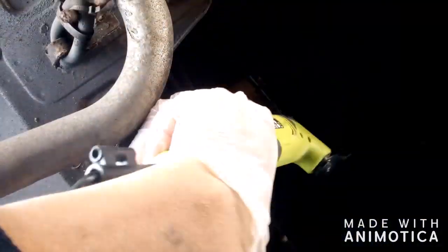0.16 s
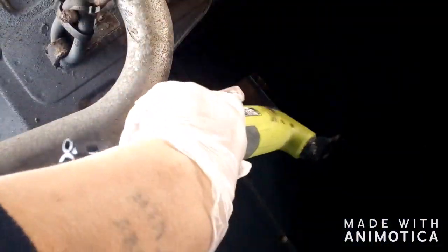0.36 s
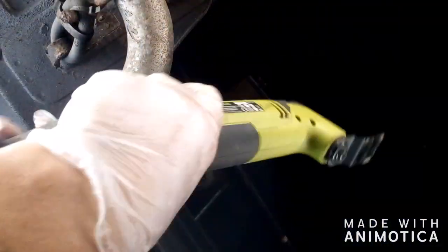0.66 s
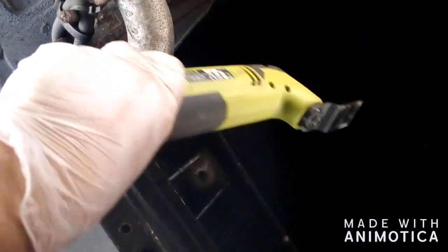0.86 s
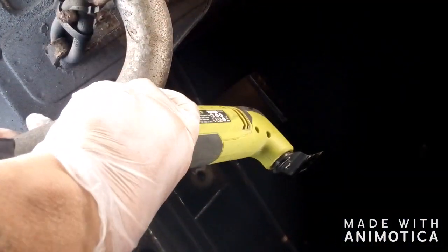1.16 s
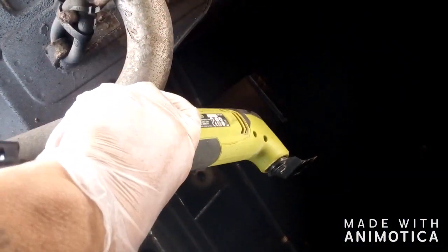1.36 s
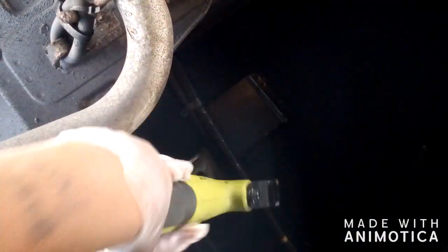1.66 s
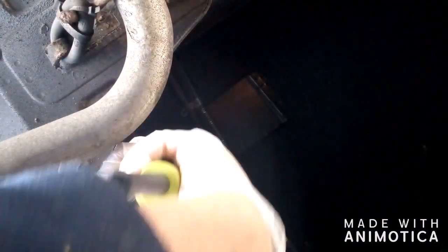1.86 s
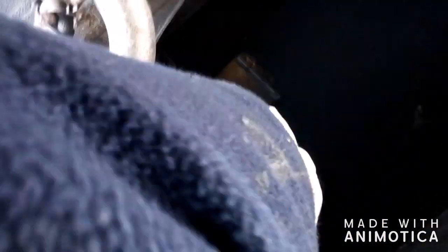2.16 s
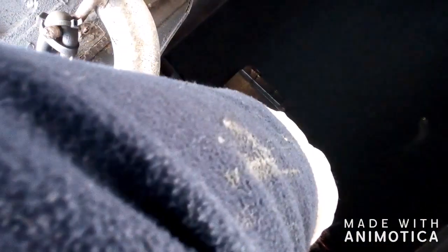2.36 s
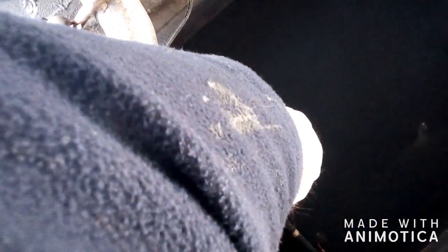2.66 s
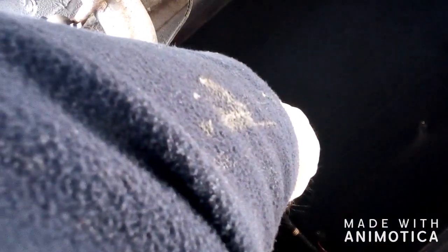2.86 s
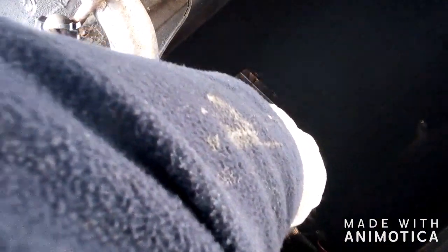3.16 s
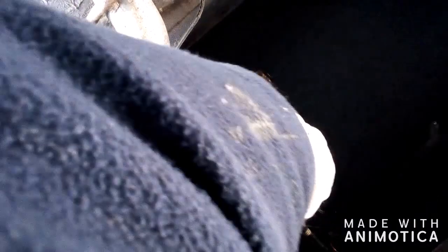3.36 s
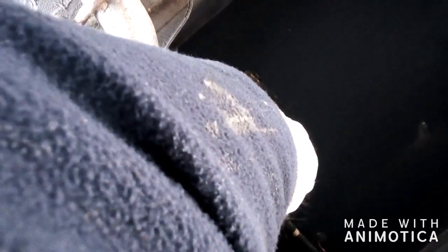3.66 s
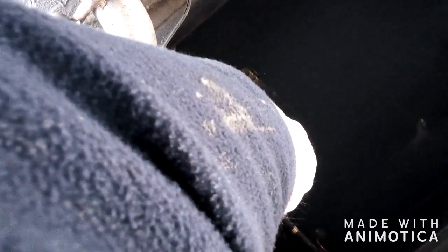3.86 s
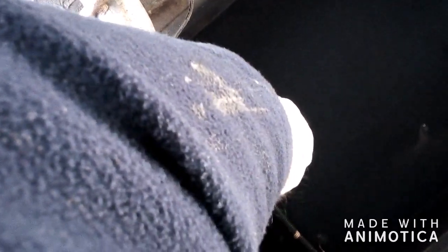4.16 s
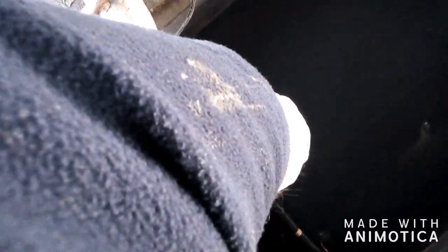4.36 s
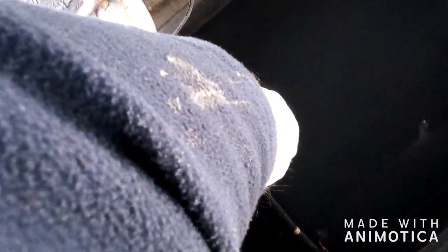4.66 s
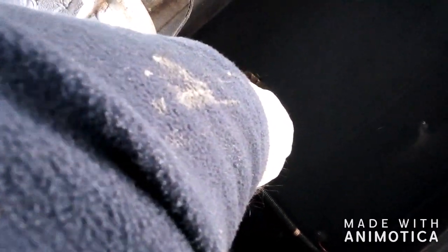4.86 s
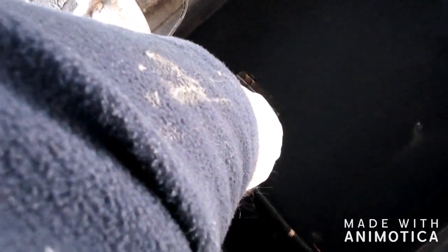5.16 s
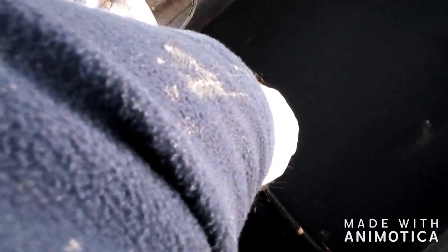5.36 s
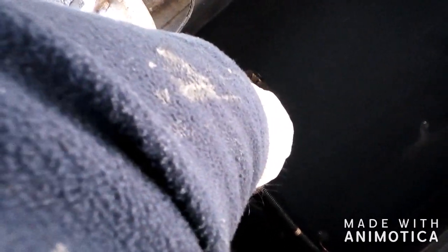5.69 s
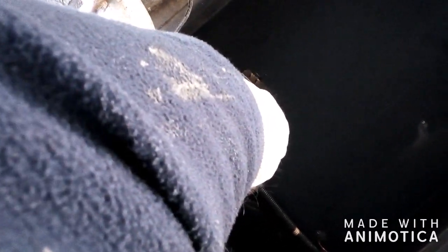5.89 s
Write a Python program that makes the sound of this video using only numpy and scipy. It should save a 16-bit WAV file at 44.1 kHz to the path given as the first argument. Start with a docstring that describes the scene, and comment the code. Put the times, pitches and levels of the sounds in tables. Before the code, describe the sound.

Close, high whine and hiss of an electric tool that stops briefly, starts again and works on steel in gusty wind.

```python
"""Geared power tool on steel, outdoors

Held close to a pair of microphones, a small tool runs free, is switched off, starts again and is pressed
on steel, which pulls its speed down. The gear mesh whines in overtones over brush and fan hiss. The
tool's air and grit puff at the left microphone, wind buffets the right, and faint noise lies far behind."""
import sys
import numpy as np
from scipy import signal
from scipy.fft import rfft, irfft
from scipy.io import wavfile
from scipy.ndimage import map_coordinates

SR = 44100
rng = np.random.default_rng(int(sys.argv[2]) if len(sys.argv) > 2 else 0)


def put_to_file(sound):
    """Save the sound as 16-bit audio at rate SR, in the file named by the first command-line argument."""
    columns = np.atleast_2d(sound).T  # one column per channel
    safe = np.clip(columns, -1, 1)
    whole_steps = np.round(safe * 32767)
    wavfile.write(sys.argv[1], SR, whole_steps.astype(np.int16))


N = 265915
TIME = np.arange(N) / SR
OFF_S, ON_S = .431, 1.521   # the switch
CUTOFF_HZ, SING_FADE_DB_PER_S = 15720, 296
# start and end of the change of grip, then of the reach out to the work: (time [s])
MOVES_S = (1.2, 1.9, 2.9, 3.099)


def mesh_rate():
    """Tooth contacts per second: running free, coasting against drag and friction, restarting, cutting."""
    # what the motor holds after the restart, sagging under the cut: (time [s], mesh rate [Hz])
    working = [(2.0, 1208), (2.34, 1199), (3.04, 1161), (3.2, 1141), (3.32, 1166), (3.42, 1160),
               (3.58, 1129), (3.92, 1130), (4.2, 1164), (4.33, 1129), (4.74, 1156), (5.13, 1141),
               (5.33, 1110), (5.59, 1106), (5.73, 1122), (6.03, 1105)]
    free_hz, friction_hz, coast_s, spin_up_s = 1224, 1410, .703, .087
    coasting = (free_hz + friction_hz) * np.exp(-np.maximum(TIME - OFF_S, 0) / coast_s) - friction_hz
    restarted = in_time(working)[0] * (1 - np.exp(-np.maximum(TIME - ON_S, 0) / spin_up_s))
    return np.maximum(1, np.maximum(coasting, restarted))


def whine_levels(mesh_hz):
    """Left and right dB of each line as the hand moves, keyed by rotor order (three to a mesh overtone)."""
    # mesh overtones 1 to 11 without the 7th, a row each:
    # (left [dB], right [dB]) in the first grip, again in the second grip, again at the work
    overtones = [(-54, -56, -51.5, -47, -53.5, -47.5), (-27, -24, -44, -43.5, -47.5, -44.5),
                 (-39.5, -36, -39, -35, -51, -42.5), (-32.5, -31.5, -31, -38, -36, -35.5),
                 (-36, -50, -46, -62, -66, -32.5), (-31.5, -29, -55, -33.5, -70, -31.5),
                 (-39, -34.5, -61, -28.5, -62, -30.5), (-50, -33.5, -34, -53, -36, -42.5),
                 (-53, -53, -60, -49, -51, -31.5), (-38, -58, -39, -59, -36, -69)]
    # the 7th, the loudest whistle, as the hand turns the tool: (time [s], left [dB], right [dB])
    seventh = [(0.2, -25, -28), (0.42, -45, -20.5), (1.85, -23.5, -41), (2.1, -35, -13), (2.44, -32, -10),
               (2.7, -32.5, -24), (3.1, -14.5, -18), (3.3, -30.5, -28.5), (3.5, -19, -13.5),
               (3.94, -28, -23), (4.12, -27, -33), (4.4, -29, -26), (5.03, -19, -33), (5.14, -29, -25.5),
               (5.46, -10.5, -13), (5.64, -20.5, -22), (6.02, -17, -24)]
    # the line nearest a pitch sings out: (start [s], length [s], pitch [Hz], left [dB], right [dB])
    singing = [(0.05, 0.31, 6100, -24.5, -28), (0.1, 0.2, 8150, -42, -38), (1.794, 0.19, 3550, -29, -21.5),
               (1.74, 1.06, 15500, -31, -42), (1.744, 0.34, 13100, -35, -28),
               (2.347, 0.28, 3180, -39, -31.5), (2.617, 0.28, 2370, -34.5, -27),
               (2.725, 0.23, 12950, -31, -24), (2.826, 0.37, 5850, -35.5, -31),
               (2.83, 0.33, 6950, -41, -21.5), (3.106, 0.45, 10350, -46, -29),
               (3.215, 0.18, 3470, -33, -23), (3.295, 0.18, 4630, -26.5, -40),
               (3.413, 0.53, 6800, -37, -24.5), (3.555, 0.37, 1130, -48, -41),
               (3.997, 0.36, 3450, -47, -23), (4.009, 1.3, 10350, -47, -27), (4.184, 0.5, 5750, -50, -29),
               (4.21, 0.92, 6900, -35, -23), (4.505, 0.45, 2300, -57, -30.5), (4.615, 0.11, 5020, -32, -36),
               (4.415, 0.66, 3450, -40, -31), (2.158, 0.43, 4780, -26, -30),
               (5.277, 0.37, 5540, -58, -23.5), (5.29, 0.4, 4430, -48, -30),
               (5.347, 0.209, 1107, -38.5, -36), (4.192, 0.096, 2300, -45.5, -31.5),
               (4.116, 0.2, 14470, -25, -35)]
    pose = np.interp(TIME, MOVES_S, (0, 1, 1, 2))   # first grip, second grip, at the work
    steady = [[np.interp(pose, range(3), db[side::2]) for side in (0, 1)] for db in overtones]
    steady.insert(6, list(in_time(seventh)))
    lines = {3 * (i + 1): db for i, db in enumerate(steady)}
    rotor_db = np.interp(pose, range(3), (-53, -50, -51.5))   # faint lines between and above those
    for order in [*range(7, 33), 36, 37.5, 39]:
        lines.setdefault(order, [rotor_db, rotor_db])
    for start, length, hz, *db in singing:
        sung_order = 3 * hz / mesh_hz[round((start + length / 2) * SR)]
        line = lines[min(lines, key=lambda order: abs(order - sung_order))]
        for side in (0, 1):
            line[side] = np.maximum(line[side], held([(start, length, db[side])], SING_FADE_DB_PER_S))
    return lines


def housing_db(pitch_hz):
    """Gain that the resonances of the housing give a line at this pitch."""
    # resonances of the housing: (frequency [Hz])
    resonances = [2850, 4100, 5070, 6700, 7900, 10130]
    grid_hz = np.arange(1, 40000, 50)
    power = sum(1 / (1 + ((grid_hz - hz) / (0.045 * hz)) ** 2) for hz in resonances)
    return np.interp(pitch_hz, grid_hz, 10 * np.log10(power))


def gear_whine(mesh_hz):
    """Meshing teeth: overtones that waver and rasp apart at each microphone. Also gives the mesh phase."""
    # a gliding line flares as it crosses a resonance: (time [s], pitch [Hz], level [dB])
    flares = [(.45, 4650, -23), (.45, 3500, -24), (.49, 3050, -24), (0.648, 2700, -16.5),
              (1.651, 2800, -20), (1.69, 5150, -20), (1.69, 6200, -21), (1.69, 7300, -17)]
    glide_db, catch_db = -36, 6
    load = np.clip((1200 - mesh_hz) / 70, 0, 1)   # the cut shakes the speed and blurs the lines
    shaken_hz = mesh_hz * (1 + (0.0015 + 0.0025 * load) * drift(65))
    phase = 2 * np.pi * np.cumsum(shaken_hz) / SR
    lines = [(order / 3, *db, 7 if order % 3 else 3) for order, db in whine_levels(mesh_hz).items()]
    lines += [(k, -90, -90, 0) for k in range(14, 28)]   # high overtones, heard only in the glides
    # off full speed the overtones sweep through the resonances of the housing
    unloading = np.clip((TIME - OFF_S) / 0.037, 0, 1) * (TIME < ON_S)   # the teeth unload at the switch
    gliding = np.maximum(np.clip((1095 - mesh_hz) / 60, 0, 1), unloading)
    wavers = [drift(8) for _ in range(8)]
    rasps = [drift(45) for _ in range(8)]
    whine = np.zeros((2, N))
    for i, (k, *steady_db, waver_db) in enumerate(lines):
        in_band = k * mesh_hz < CUTOFF_HZ
        start_phase = rng.uniform(0, 2 * np.pi)
        swept_db = glide_db - 7 * (k % 1 > 0) + housing_db(k * mesh_hz)
        crossings = [(s, 0, db) for s, hz, db in flares if round(hz / mesh_hz[round(s * SR)]) == k]
        for side in (0, 1):
            pick, shift = (2 * i + side) % 8, 9973 * i   # each line moves in its own way
            waver, rasp = np.roll(wavers[pick], shift), np.roll(rasps[pick], shift)
            level_db = steady_db[side] + waver_db * waver + (1.47 + 2.65 * load) * min(k / 2, 1) * rasp
            catching = np.clip(2 * np.roll(rasp, N // 2) - 1, 0, 1)   # the line dips as the blade catches
            level_db -= catch_db * load * catching
            level_db += gliding * (swept_db + 6.1 * rasp - level_db)
            if crossings:
                level_db = np.maximum(level_db, held(crossings, 2 * SING_FADE_DB_PER_S))
            lag = 0.86 * np.roll(waver, N // 2)   # the path to the microphone shifts as the hand moves
            whine[side] += in_band * amp(level_db) * np.sin(k * phase + start_phase + lag)
    throb = 1 + 0.066 * np.sin(phase / 3)   # uneven gears put faint lines beside the loud ones
    speed_gain = np.minimum(mesh_hz / 1000, 1) ** 1.4
    return np.sqrt(2) * whine * throb * speed_gain, phase


def brush_and_fan_hiss(mesh_hz, phase):
    """Hiss pulsing with the rotor, with random louder and fainter patches in time and pitch."""
    # hiss at full speed as the tool comes near and moves off: (time [s], left [dB], right [dB])
    nearness = [(.2, -21, -23), (.58, -27, -24), (1.6, -18, -15), (1.98, -12.5, -13), (2.3, -43, -18),
                (2.64, -15, -19), (2.9, -23, -20), (3.28, -27, -18), (4.3, -23.5, -18)]
    # spectrum of the hiss: (frequency [Hz], left [relative dB], right [relative dB])
    spectrum = [(157, -20.5, -48.5), (2030, -10.5, -10), (3220, -1, -1), (3940, -6, -1.5), (7150, 3, 1.5),
                (7860, -3.5, 10), (12440, -0.5, -8.5), (16000, 7.5, 4.5)]
    shared = 0.63   # share of the power common to both microphones
    patch_db, patch_hz, patch_s = 5.5, 171.1, .09   # depth and size of the patches
    white = rng.standard_normal((3, N))
    pair = np.sqrt(shared) * white[2] + np.sqrt(1 - shared) * white[:2]
    hz, s, cells = signal.stft(pair, SR, nperseg=1024)
    grid = np.meshgrid(hz / patch_hz, s / patch_s, indexing="ij")
    coarse = rng.standard_normal((4, 400, 400))   # left and right level, left and right phase
    patches = np.array([rms_one(map_coordinates(field, grid, order=1)) for field in coarse])
    cells = cells * amp(patch_db * patches[:2]) * np.exp(.6j * patches[2:])
    shaded = np.outer(hz > 11900, (s > MOVES_S[0]) & (s < MOVES_S[2]))
    cells *= amp(-2 * shaded)   # in the second grip the hand shades the top of the hiss
    patchy = signal.istft(cells, SR, nperseg=1024)[1][:, :N]
    colour_hz, *colour_db = np.transpose(spectrum)
    hiss = np.array([coloured(patchy[side], colour_hz, colour_db[side]) for side in (0, 1)])
    speed_gain = np.minimum(mesh_hz / 780, 1) ** 0.75
    rotor_pulse = 1 + 0.24 * np.sin(phase / 3)
    return amp(in_time(nearness)) * speed_gain * hiss * rotor_pulse


def air_and_grit():
    """The tool's air puffs on the left microphone; with each puff, grit spits in the treble of both."""
    # puffs of air: (start [s], length [s], level [dB])
    puffs = [(4.383, 0.0086, -29.5), (4.805, 0.023, -29.5), (4.845, 0.006, -20.5), (5.098, 0.068, -22.5),
             (5.175, 0.038, -26), (5.626, 0.0037, -22.5), (5.682, 0.023, -27.5), (5.762, 0.011, -24.5),
             (5.79, 0.029, -26.5), (5.848, 0.044, -21.5), (6.008, 0.0043, -19)]
    # spectrum of a puff: (frequency [Hz], level [relative dB])
    spectrum = [(30, -57), (400, 3.5), (900, 0), (2000, -2.5), (3500, -8), (7000, -67)]
    air = buffet(spectrum, lumps_db=4, lumps_hz=60)
    treble = signal.butter(3, 12300, "high", fs=SR, output="sos")
    spray = amp(13) * signal.sosfilt(treble, rng.standard_normal((2, N)))
    spray[0] += air
    return amp(held(puffs, fade_db_per_s=2200)) * spray


def wind():
    """A breeze and its gusts buffeting one microphone."""
    # steady wind: (time [s], level [dB])
    breeze = [(0, -35), (.6, -29), (.95, -38.5), (2.4, -41.5), (3.3, -38.5), (3.6, -61)]
    # gusts: (start [s], length [s], level [dB])
    gusts = [(.14, 0.085, -26.5), (.445, 0.084, -23.5), (1.055, 0.21, -15.5), (1.335, 0.21, -16.5),
             (1.53, 0.13, -15), (1.68, 0.28, -22), (2.045, 0.012, -19), (2.09, 0.066, -22),
             (3.0, 0.11, -24)]
    # spectrum of the wind: (frequency [Hz], level [relative dB])
    spectrum = [(30, -20), (150, -16.5), (400, -4), (800, -8.5), (1700, -18), (2700, -37.5), (6000, -77)]
    level_db = np.maximum(in_time(breeze)[0], held(gusts, fade_db_per_s=702))
    return amp(level_db) * buffet(spectrum, lumps_db=4.5, lumps_hz=92)


def buffet(spectrum, lumps_db, lumps_hz):
    """Turbulence on a microphone port: noise in lumps, rms 1."""
    lumps = amp(lumps_db * np.minimum(drift(lumps_hz), 1.7))
    return rms_one(lumps * coloured(rng.standard_normal(N), *np.transpose(spectrum)))


def recorder_clicks():
    """Sharp recorder clicks in the right channel during the loud wind, each two samples wide."""
    # recorder clicks: (time [s], peak [dB])
    peaks = [(1.069, -18), (1.1206, -14.5), (1.1739, -10.5), (1.3336, -17.5), (1.442, -16.5), (1.494, -6)]
    impulses = np.zeros(N)
    for s, db in peaks:
        impulses[round(s * SR)] = amp(db) * rng.choice([-1, 1])
    return signal.lfilter([1, 1], [1], impulses)


def distant_noise():
    """The outdoors far off: a dull, steady noise, separate at each microphone."""
    # level of the background: (left [dB], right [dB])
    floor_db = (-57.5, -52)
    hz, colour_db = [100, 500, 1500, 4000, 14000], [6.5, 4.5, -3.5, -5, -21.5]
    return np.array([amp(db) * coloured(rng.standard_normal(N), hz, colour_db) for db in floor_db])


def amp(db):
    """Decibels to amplitude."""
    return 10 ** (np.asarray(db) / 20)


def rms_one(x):
    """Scales a signal to rms 1."""
    return x / np.sqrt(np.mean(x ** 2) + 1e-20)


def in_time(rows):
    """Joins rows of (time [s], values...) by straight lines, one curve per value column."""
    s, *columns = np.transpose(rows)
    return np.array([np.interp(TIME, s, column) for column in columns])


def held(rows, fade_db_per_s):
    """Level in dB of events that hold for their length and fade evenly before and after."""
    level_db = np.full(N, -120.)
    for start, length, db in rows:
        outside_s = np.maximum(0, np.maximum(start - TIME, TIME - start - length))
        level_db = np.maximum(level_db, db - fade_db_per_s * outside_s)
    return level_db


def drift(rate_hz):
    """Slow random wander: noise through a double one-pole low-pass, spread 1."""
    pole = np.exp(-64 * np.pi * rate_hz / SR)
    slow = signal.lfilter([1], [1, -2 * pole, pole * pole], rng.standard_normal(N // 32 + 2002))[2000:]
    return np.interp(np.arange(N) / 32, np.arange(len(slow)), rms_one(slow))


def coloured(x, hz, db):
    """Shapes the spectrum by straight lines on a log axis; rms 1."""
    bins_hz = np.maximum(np.fft.rfftfreq(N, 1 / SR), 1)
    gain = amp(np.interp(np.log(bins_hz), np.log(hz), db))
    return rms_one(irfft(rfft(x) * gain, N))


def scene():
    """The tool close up on both microphones, wind and recorder clicks on the right, the outdoors behind."""
    mesh_hz = mesh_rate()
    whine, phase = gear_whine(mesh_hz)
    background = distant_noise()
    swell = amp(-397 * np.maximum(1.594 - TIME, 0) * (TIME > ON_S))   # the restart swells in, 397 dB/s
    tool = swell * (whine + brush_and_fan_hiss(mesh_hz, phase))
    rumble = wind()
    left, right = tool + air_and_grit() + background
    return np.array([left, right + rumble + recorder_clicks()])


def record(dry):
    """The recorder rounds the peaks and cuts the top steeply."""
    rounded = 0.67 * np.tanh(dry / 0.79)
    return signal.sosfilt(signal.ellip(12, .3, 70, CUTOFF_HZ, fs=SR, output="sos"), rounded)


dry = scene()
out = record(dry)
put_to_file(out)
```